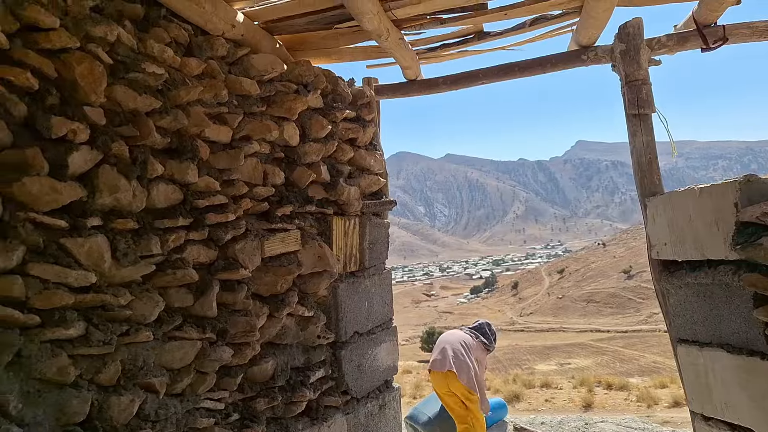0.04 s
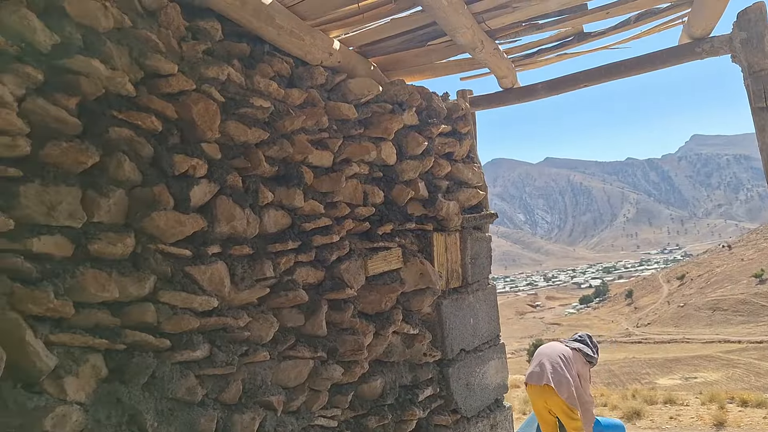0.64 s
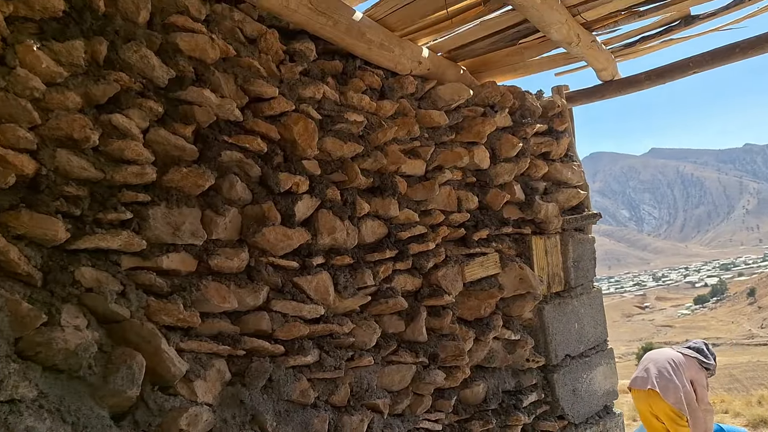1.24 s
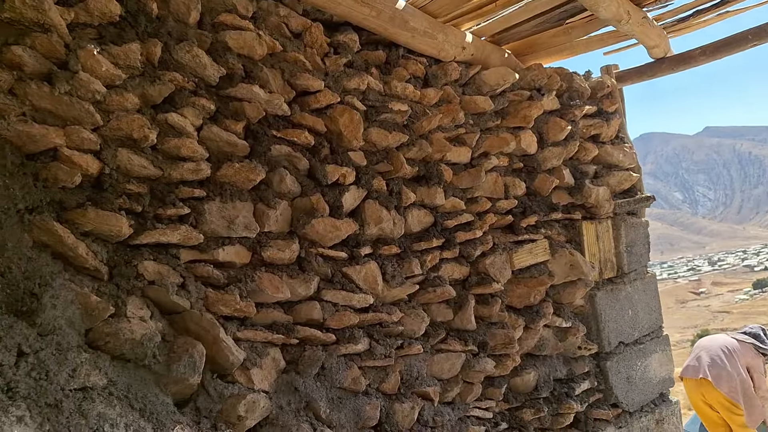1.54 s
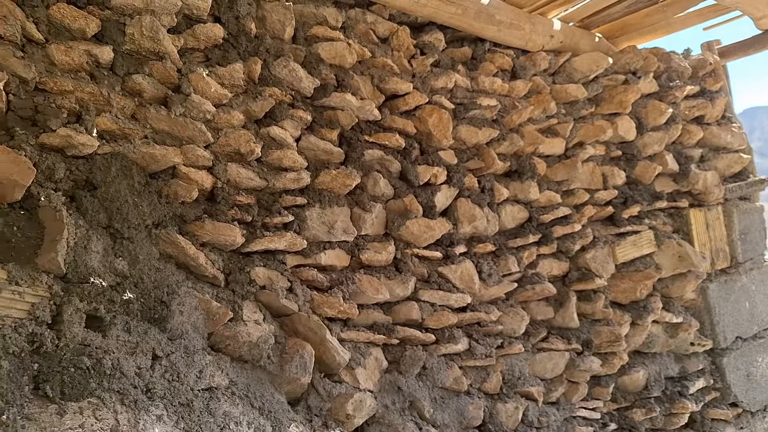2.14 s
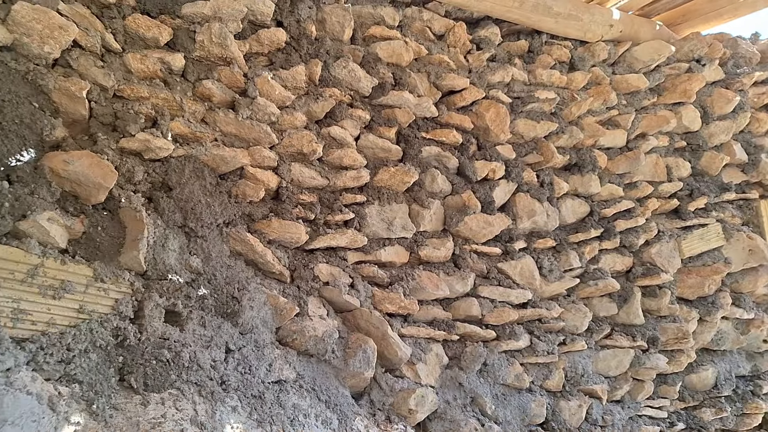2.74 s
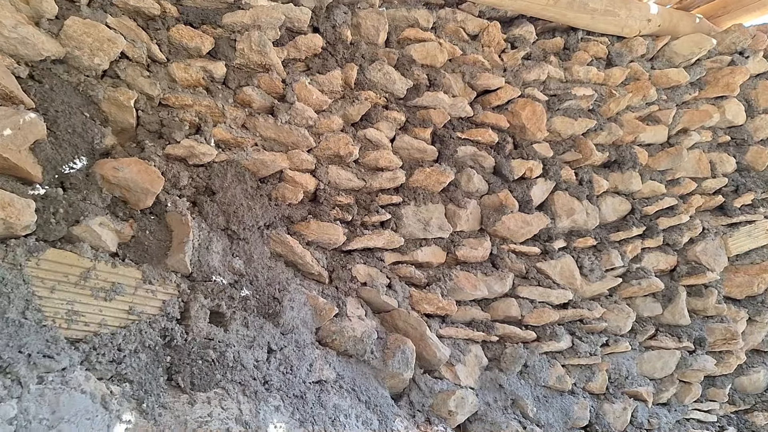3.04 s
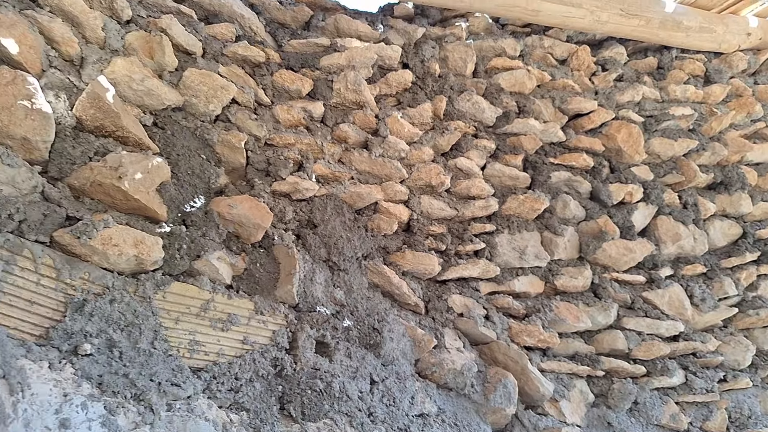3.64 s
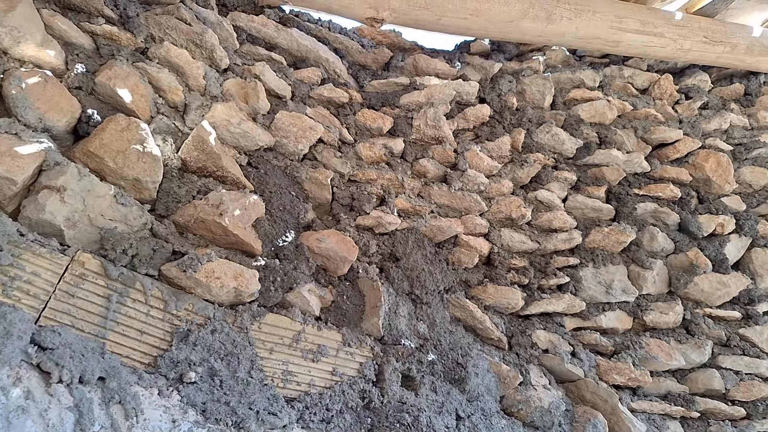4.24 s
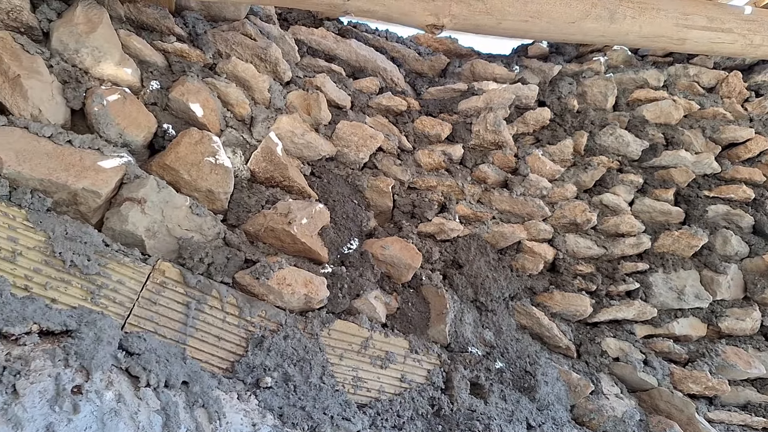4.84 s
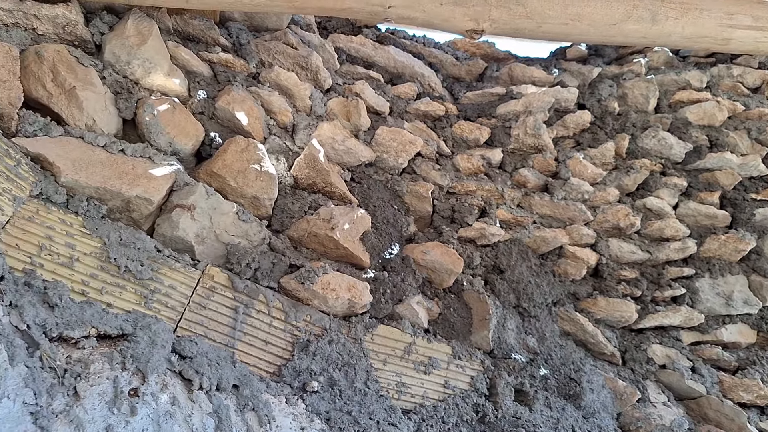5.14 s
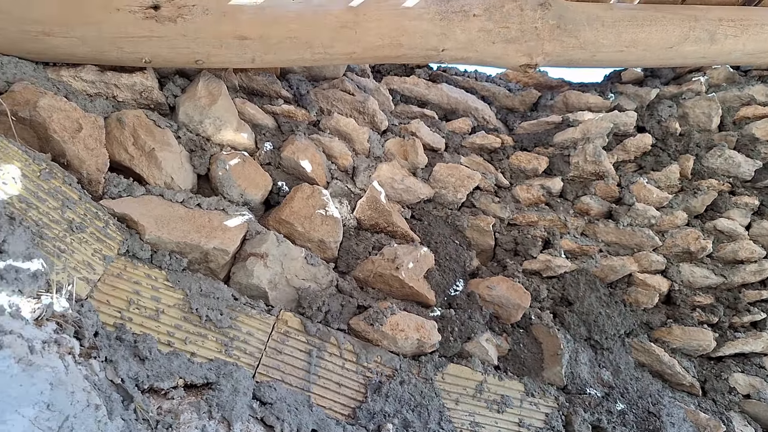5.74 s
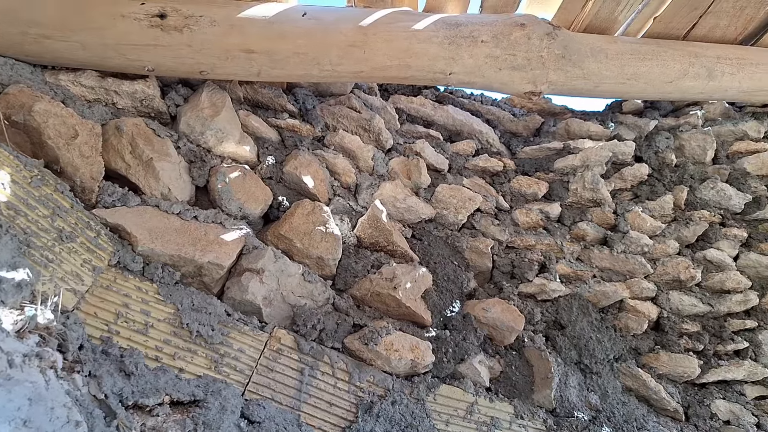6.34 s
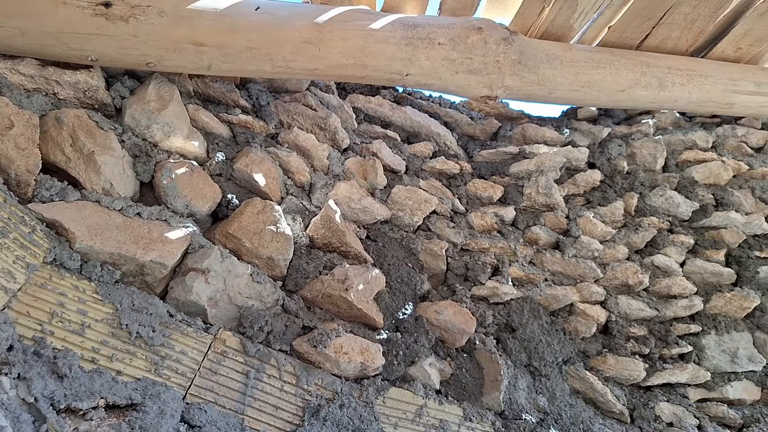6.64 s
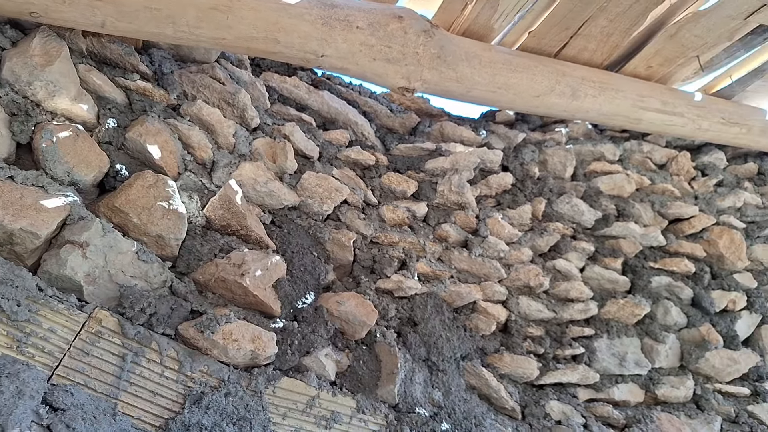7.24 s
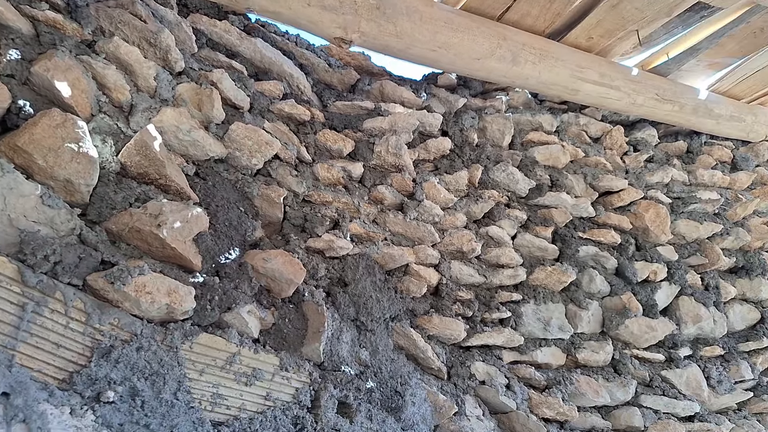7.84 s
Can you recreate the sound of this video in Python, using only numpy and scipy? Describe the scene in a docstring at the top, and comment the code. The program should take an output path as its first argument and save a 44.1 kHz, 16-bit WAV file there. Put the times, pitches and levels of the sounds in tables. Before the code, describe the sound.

A steel hand trowel sweeps back and forth over wet, sandy mortar in uneven hissing, rasping strokes, sometimes pressing down with a dull thud. Four times a shovel bites into the mix, louder, with gravel grinding and stones clacking on its briefly ringing blade. The work is close by, outdoors beside a stone wall, over a faint low rumble. At the very end, wind briefly bumps the left microphone.

```python
"""Working mortar by a stone wall

A hand trowel sweeps to and fro over wet, gritty mortar: sand hisses under the steel, coarser grains
make the plate rasp, and the blade presses down with dull thuds. Now and then a shovel bites into the
mix, and stones grind and clack along its ringing blade. Under it lie a low rumble and a soft hum;
at the very end, wind briefly buffets the left microphone."""
import sys
import numpy as np
from scipy import signal
from scipy.fft import irfft, next_fast_len
from scipy.io import wavfile

SR = 44100
rng = np.random.default_rng(int(sys.argv[2]) if len(sys.argv) > 2 else 0)


def persist_wave(psi):
    """Save psi, clipped to +-1, as 16-bit WAV."""
    counts = np.round(np.clip(psi, -1, 1) * 32767).astype(np.int16)
    wavfile.write(sys.argv[1], SR, np.atleast_2d(counts).T)


N = 351918

# hiss of sand under steel: (frequency [Hz], level [dB])
SAND = [(710, -24), (1200, -2), (1830, -0.5), (2200, -0.5), (2380, -2), (3290, -2.5), (4170, -4.5),
        (4500, -4), (6230, -6), (7490, -3), (8720, -11.5), (12700, -6.5), (15200, -17.5), (16000, -15)]
# grind of coarse grit: (frequency [Hz], level [dB])
GRIT = [(120, -48), (200, -8), (294, -18.5), (334, -11), (387, -9.5), (722, -2.5), (968, -5), (1230, -11),
        (1770, -6), (2050, -14.5), (2330, -11), (4430, -9.5), (8580, -15), (12600, -16), (16000, -24.5)]
# modes of the shovel blade: (frequency [Hz], level [dB])
BLADE_MODES = [(265, -0.5), (340, 8), (425, -6), (475, -2), (544, -3), (646, -3), (724, -4), (904, -8.5),
               (1144, -2.5), (1233, 12.5), (1292, -16.5), (1879, -10.5), (1990, -7), (2139, 0.5),
               (2554, -11), (2803, -6), (3090, -4.5), (3908, -13.5)]
# stereo width: (frequency [Hz], left-right correlation [-1..1])
CORRELATION = [(40, .75), (110, .92), (350, .92), (650, .68), (1000, .05), (1400, -.45), (2200, 0),
               (15000, 0)]
# stereo balance: (frequency [Hz], left minus right [dB])
BALANCE = [(60, 9.5), (92, 2), (140, 2.5), (210, 9), (330, 2.5), (500, -0.5), (770, 2), (1170, -1.5),
           (1790, -3), (2740, -2.0), (4190, -3.5), (6410, 2), (9810, -2), (15000, -7)]

SIDES = np.array([[1], [-1]])   # left, right
FFT_SIZE = next_fast_len(N)
HZ = np.arange(FFT_SIZE // 2 + 1) * SR / FFT_SIZE + 1e-3
CLOCK = np.arange(0, N / SR + .002, .001)   # time base of the hand movements [s]


def from_db(db):
    """Decibels to gain."""
    return 10 ** (np.asarray(db) / 20)


def unit_power(x):
    """Scale to an RMS of one."""
    return x / np.sqrt(np.mean(x ** 2) + 1e-20)


def at_hz(points, hz):
    """Read a curve on a log-frequency axis."""
    f, value = np.transpose(points)
    return np.interp(np.log(hz + 1), np.log(f), value)


def band(low_hz, high_hz, order=6):
    """Gain of a steep band-pass."""
    return ((1 + (low_hz / HZ) ** (2 * order)) * (1 + (HZ / high_hz) ** (2 * order))) ** -.5


def colour(spectrum):
    """Gain of a spectrum table."""
    return from_db(at_hz(spectrum, HZ))


def resonances(modes):
    """Gain of a set of peaks: (frequency [Hz], width [Hz], level [dB])."""
    return np.sqrt(sum(from_db(db) ** 2 / (1 + (2 * (HZ - hz) / width) ** 2) ** 2
                       for hz, width, db in modes))


def wash(gain):
    """Coloured stereo noise of unit power: alike in the bass, unrelated in the treble."""
    mid, side = rng.standard_normal((2, 2 * len(HZ)), dtype=np.float32).view(np.complex64)
    pan = from_db(SIDES * at_hz(BALANCE, HZ) / 2)
    alike = at_hz(CORRELATION, HZ)
    spectrum = gain * pan * (np.sqrt(1 + alike) * mid + SIDES * np.sqrt(1 - alike) * side)
    return unit_power(irfft(spectrum.astype(np.complex64), FFT_SIZE)[:, :N])


def drift(rate_hz):
    """Smooth random wander of unit power."""
    pole = np.exp(-40 * np.pi * rate_hz / SR)
    slow = signal.lfilter([1], [1, -2 * pole, pole * pole], rng.standard_normal(N // 20 + 2002))[2000:]
    return np.interp(np.arange(N) / 20, np.arange(len(slow)), unit_power(slow))


def dying(power, t60):
    """Each burst of power dies away exponentially."""
    return signal.lfilter([1], [1, -from_db(-120 / (t60 * SR))], power + 1e-18)


def grains(per_s, spread_db, t60):
    """Envelope of grains that catch and break at random; spread makes a few of them larger."""
    power, caught = np.zeros(N), rng.random(N) < per_s / SR
    power[caught] = from_db(spread_db * np.minimum(rng.exponential(1, N)[caught], 4)) ** 2
    return unit_power(np.sqrt(dying(power, t60)))


def blows(times, levels_db, t60, rise_s):
    """Envelope of single blows: a quick rise, then a decay."""
    power = np.zeros(N)
    power[np.clip(np.round(times * SR).astype(int), 0, N - 1)] = from_db(levels_db) ** 2
    pole = np.exp(-1 / (rise_s * SR))
    return np.sqrt(signal.lfilter([1 - pole], [1, -pole], dying(power, t60)))


def columns(rows):
    """The columns of an event table, ready to spread over time."""
    return np.transpose(rows)[..., None]


def swells(start, hold, rise, fall):
    """Level in dB, one row per stroke: the rise ends at start; rise and fall each cover 20 dB."""
    outside = np.maximum((start - CLOCK) / rise, (CLOCK - start - hold) / fall)
    return -20 * np.clip(outside, 0, 10) ** 0.97


def progress(start, length):
    """Runs from 0 to 1 during each stroke."""
    return np.clip((CLOCK - start) / length, 0, 1)


def summed(levels_db, lag_s=0):
    """Gain at every sample of strokes that add in power."""
    gain = np.sqrt(np.sum(from_db(levels_db) ** 2, axis=0))
    return np.interp(np.arange(N) / SR - lag_s, CLOCK, gain)


def trowel_strokes():
    """Envelopes of hiss, fine dust and rasp: long even glides, with short flicks on top."""
    # the trowel glides over the mortar: (time [s], hold [s], rise [s], hiss [dB],
    # swell over the hold [dB], rasp offset [dB], dust offset [dB])
    sweeps = [(0.0, 0.12, .05, -49, -9, -4, -3.5), (0.22, 0.15, 0.047, -48.5, 4, -2.5, -1.5),
              (0.59, 0.084, 0.11, -44.5, 1, -5, -3), (0.83, 0.08, 0.25, -57, -2, -0.5, -1.5),
              (0.93, 0.15, .05, -69.5, -8, -2, 0.5), (1.44, .13, 0.084, -54.5, 2, -1.5, -5),
              (1.62, 0.25, 0.098, -60, -4, -7.5, -0.5), (2.27, 0.015, 0.078, -54, 3.5, -10.5, -4),
              (2.33, 0.073, 0.1, -59.5, 4.5, -5, -6.5), (2.44, 0.13, 0.073, -69.5, -14.5, 5.5, -6.5),
              (2.9, 0.61, 0.065, -56.5, 1.5, -3.5, -3.5), (3.4, 0.015, 0.041, -78, -1, 1, -13),
              (3.53, 0.046, 0.063, -43.5, 0.5, -5.5, -6.5), (3.79, 0.081, 0.04, -46, 4, -6.5, -3.5),
              (4.1, 0.081, .045, -46, -2, -5.5, -1.5), (4.36, 0.079, 0.2, -62.5, -3, -3.5, 0.5),
              (4.48, .14, .05, -79.5, 1, 7, -13), (4.99, 0.16, .15, -47, -3.5, -5.5, -6),
              (5.17, 0.13, 0.059, -58.5, -11, -3.5, -0.5), (5.4, 0.043, .08, -47.5, -3.5, -0.5, -5),
              (5.57, .11, 0.13, -48, 1, -3, -4.5), (5.94, 0.11, 0.094, -47, -2, -8, -3),
              (6.1, 0.3, .05, -62.5, -15.5, -10, -4), (6.385, 0.17, 0.02, -49.5, -6.5, -0.5, -2.5),
              (6.58, 0.054, 0.095, -42, 4.5, 0, -3), (6.82, 0.15, 0.085, -47, 7, -3, -1.5),
              (7.1, 0.078, 0.056, -53, -0.5, -3.5, -2), (7.33, .13, 0.13, -69, 2, -28, 3),
              (7.49, 0.17, .05, -64, -7.5, -0.5, -2)]
    # the wrist speeds up and presses the blade down:
    # (peak time [s], rise [s], fall [s], hiss [dB], rasp offset [dB], dust offset [dB])
    flicks = [(0.14, 0.065, 0.048, -35, -1.5, -4), (0.468, .068, 0.029, -28, -6.5, -4),
              (1.985, 0.043, 0.11, -33.5, -5, -2), (3.343, 0.034, 0.04, -37, 1.5, -5),
              (3.658, 0.077, 0.031, -35, -1, -4), (3.954, 0.057, 0.03, -31, -4, -2.5),
              (5.799, 0.088, 0.05, -35, -7, -3.5), (6.668, 0.025, 0.031, -38.5, 1, -5.5),
              (6.995, 0.038, 0.031, -32.5, -0.5, -3.5)]
    time, hold, rise, db, swell_db, rasp_db, dust_db = columns(sweeps)
    glide_db = db + swells(time, hold, rise, fall=0.04) + swell_db * (progress(time, hold) - .5)
    time, rise, fall, db, flick_rasp_db, flick_dust_db = columns(flicks)
    hiss_db = np.vstack([glide_db, db + swells(time, 0, rise, fall)])
    dust = summed(hiss_db + np.vstack([dust_db, flick_dust_db]))
    rasp = summed(hiss_db + np.vstack([rasp_db, flick_rasp_db]))
    return summed(hiss_db), dust, rasp


def trowel(hiss, dust, rasp):
    """Fine sand hisses under the steel; coarser grains make the damped plate rasp."""
    # body of the damped plate: (frequency [Hz], level [dB])
    plate_body = [(150, -17), (250, 0), (302, -13), (366, -7), (397, 1.5), (461, -5), (762, -1.5),
                  (1160, 0), (1620, 1.5), (1800, -2.5), (2340, -21.5), (3960, -120)]
    # resonances of the trowel: (frequency [Hz], width [Hz], level [dB])
    plate_modes = [(730, 540, -5.5), (1980, 62, -1.5), (2680, 93, -0.5), (3170, 37, -14), (3984, 91, 4.5),
                   (4480, 35, 3.5)]
    fine = grains(per_s=1200, spread_db=0, t60=0.13)
    coarse = grains(per_s=900, spread_db=2, t60=0.04)
    # each upper resonance comes and goes as the contact shifts
    rings = sum(wash(resonances([(hz, width, db)])) * from_db(db + 3.5 * drift(rate_hz=12))
                for hz, width, db in plate_modes if hz > 1500)
    sand = wash(colour(SAND) * band(2370, 6470)) * from_db(-2) + unit_power(rings) * from_db(-12)
    # the lowest part of the hiss needs pressure on the blade
    pressed = np.sqrt(hiss * rasp) * wash(colour(SAND) * band(1633, 2500)) * from_db(-7.5)
    fizz = wash(colour(SAND) * band(7000, 21000))
    plate_tone = unit_power(colour(plate_body)) + from_db(-5.5) * unit_power(resonances(plate_modes))
    plate = wash(plate_tone * band(267, 2300))
    return (fine * (hiss * sand + dust * fizz + pressed) + coarse * rasp * plate) * from_db(1)


def trowel_ring(hiss):
    """The steel rings more freely when it barely touches, so it stands out in the lightest strokes."""
    # thin ring of the free plate: (frequency [Hz], width [Hz], level [dB])
    free_modes = [(2786, 59, -10), (2893, 61, -3.5), (3620, 35, -4), (4930, 240, -4)]
    follow = 0.38   # share of the hiss's swing in dB
    return hiss ** follow * from_db(-48.5) * wash(resonances(free_modes))


def crumbs(low_hz, high_hz, count):
    """Bits of gravel are flicked aside at random, each with a brief ring of its own pitch."""
    spread_db, t60_cycles = 1.5, 51
    out, age = np.zeros((2, N + SR)), np.arange(SR // 30) / SR
    for when, softness, pitch, left, right in rng.random((count, 5)):
        hz, start = low_hz * (high_hz / low_hz) ** pitch, int(when * N)
        level_db = -spread_db * min(-np.log(1 - softness), 4)
        decay = from_db(level_db - 60 * age * hz / t60_cycles)
        ring = np.sin(2 * np.pi * (hz * age + np.array([[left], [right]])))
        out[:, start:start + len(age)] += decay * ring
    return unit_power(out[:, :N])


def ground_rumble(dragging):
    """Dragged tools shake the ground, over the low rumble of the yard."""
    # tone of the ground: (frequency [Hz], level [dB])
    ground_tone = [(15, -52.5), (25, -8.5), (49, -10), (97, 1.5), (116, -3), (178, -11), (198, -9.5),
                   (259, -10), (300, 5.5), (390, -33), (660, -120)]
    # the yard's own rumble: (time [s], level [dB])
    yard_rumble = [(0.0, -52), (0.6, -53), (1.0, -66.5), (1.5, -61.5), (1.8, -83), (3.0, -61.5),
                   (5.5, -62.5), (7.5, -72)]
    bed = from_db(np.interp(np.arange(N) / SR, *np.transpose(yard_rumble)))
    return np.hypot(dragging, bed) * wash(colour(ground_tone) * band(36, 220)) * from_db(-2)


def still_air():
    """A faint, steady bed of outdoor air."""
    # tone of the air: (frequency [Hz], level [dB])
    air_tone = [(60, -5), (170, -12.5), (400, -15), (800, -21), (1400, -19), (2900, -27), (9000, -26.5),
                (12000, -27), (16000, -28)]
    return wash(colour(air_tone)) * from_db(-67)


def wall_echoes(sound, t60, count=24):
    """Faint echoes from wall and ground, different on each side; only the shorter waves scatter."""
    out = np.zeros((2, N))
    for k, (delay, sign) in enumerate(zip(rng.uniform(.006, .09, count), rng.choice([-1, 1], count))):
        lag = int(delay * SR)
        out[k % 2, lag:] += sign * from_db(-60 * delay / t60) * sound[k % 2, :-lag]
    return signal.sosfilt(signal.butter(2, 600, "high", fs=SR, output="sos"), out)


def grain_snaps():
    """Single grains snap brightly."""
    # snapping grains: (time [s], level [dB])
    snaps = [(0.2204, -48), (1.53, -42), (1.218, -17), (1.836, -41), (1.936, -34), (3.335, -29),
             (3.7758, -39.5), (4.7552, -17), (5.52, -61), (6.21, -40), (7.666, -34), (7.702, -26.5)]
    time, db = np.transpose(snaps)
    envelope = blows(time, db, t60=0.047, rise_s=0.00048)
    return envelope * wash(colour(SAND) * band(3300, 17000)) * from_db(-6.5)


def stone_clacks():
    """A stone hits the blade: a short crack and knock, then a ring that the mortar soon damps."""
    # stones striking the blade: (time [s], impact [dB], ring pitch [Hz], ring [dB])
    strikes = [(0.345, -46, 1150, -47), (0.667, -39, 900, -57), (0.827, -33, 392, -47.5),
               (1.127, -37, 1150, -46), (1.2, -11.5, 770, -44), (1.221, -12, 330, -25),
               (1.241, -17, 510, -27), (1.25, -19.5, 870, -30), (1.271, -30, 447, -21.5),
               (2.596, -15.5, 2010, -27.5), (2.654, -24.5, 740, -40), (2.699, -5, 540, -39),
               (2.706, -22, 2040, -21.5), (2.738, -22.5, 346, -22.5), (2.76, -9, 644, -25.5),
               (2.787, -19, 653, -37), (2.815, -19.5, 679, -23.5), (2.98, -35, 840, -52),
               (3.14, -46, 730, -68), (3.197, -52, 930, -56), (3.336, -28, 726, -41),
               (3.948, -15, 788, -36), (4.665, -20, 1220, -29.5), (4.674, -16, 438, -28.5),
               (4.712, -14, 1250, -22.5), (4.712, -25, 698, -21.5), (4.756, -8.5, 1290, -37),
               (5.281, -42, 744, -57), (6.375, -36, 402, -45), (6.752, -45, 900, -60),
               (7.662, -26, 617, -46), (7.896, -20, 618, -32.5)]
    time, db = np.transpose(strikes)[:2]
    crack = blows(time, db - 18.5, t60=0.05, rise_s=.0015) * wash(colour(GRIT) * band(1800, 16000))
    knock = blows(time, db - 8.5, t60=0.045, rise_s=0.001) * wash(colour(GRIT) * band(300, 3000))
    return crack + knock + blade_ring(strikes, t60=0.09, reach_octaves=0.088) * from_db(8)


def blade_ring(strikes, t60, reach_octaves):
    """Each stone rings mainly the modes near one pitch, which depends on where it hits."""
    out, age = np.zeros((2, N)), np.arange(SR // 8) / SR
    hz, mode_db = np.transpose(BLADE_MODES)
    envelope = from_db(-60 * age / t60) * (1 - np.exp(-age / 0.0041))
    for time, _, centre_hz, ring_db in strikes:
        nearness = np.exp(-(np.log2(hz / centre_hz) / reach_octaves) ** 2)
        weight = from_db(0.34 * mode_db) * (nearness + 0.046)
        # high modes reach left and right out of step
        phase = 2 * np.pi * rng.random(len(hz)) + rng.standard_normal((2, len(hz))) * hz / 1600
        ring = weight @ np.sin(2 * np.pi * hz[:, None] * age + phase[..., None]) / np.linalg.norm(weight)
        start = round(time * SR)
        out[:, start:start + len(age)] += (from_db(ring_db) * envelope * ring)[:, :N - start]
    return out


def low_thuds(t60):
    """Dull low thuds, each a soft slap and a few damped low cycles."""
    # dull low thuds; the last two are wind buffeting the left microphone:
    # (time [s], level [dB], pitch [Hz])
    thuds = [(0.459, -30, 91.5), (0.52, -25.5, 108), (0.551, -32, 96.5), (0.583, -38.5, 89.5),
             (0.681, -42, 53), (1.218, -31, 112), (2.588, -40.5, 183), (2.731, -30, 95.5),
             (2.754, -24.5, 96), (3.332, -36.5, 91.5), (3.943, -33.5, 95), (4.675, -36.5, 120),
             (4.975, -45.5, 116), (5.301, -51, 104), (5.789, -54, 85), (6.574, -45, 99.6),
             (6.653, -39, 101), (6.998, -33, 90), (7.697, -38, 158), (7.873, -29.5, 54.4),
             (7.901, -29, 48.7)]
    thumps, age = np.zeros((2, N)), np.arange(SR // 5) / SR
    for time, db, hz in thuds:
        envelope = from_db(db - 60 * age / t60) * (1 - np.exp(-age / 0.0034))
        thump = envelope * np.sin(2 * np.pi * hz * age)
        pan = from_db(SIDES * at_hz(BALANCE, hz) / 2)
        start = round(time * SR)
        thumps[:, start:start + len(age)] += pan * thump[:N - start]
    time, db = np.transpose(thuds)[:2]
    slaps = blows(time, db, t60=0.078, rise_s=0.0038) * wash(band(130, 380, order=3))
    return thumps * from_db(5) + slaps * from_db(-11.5)


def low_hum():
    """A soft, narrow band of low noise swells between strokes."""
    # swells of the hum: (peak time [s], rise [s], level [dB])
    hum_swells = [(0.88, 0.1, -54.5), (1.45, 0.08, -64), (1.63, 0.18, -62.5), (2.46, 0.25, -56.5),
                  (4.38, 0.5, -67), (4.6, 0.16, -62.5), (5.8, 0.2, -65), (6.6, 0.32, -70)]
    time, rise, db = columns(hum_swells)
    return summed(db + swells(time, 0, rise, fall=0.044)) * wash(band(132, 180)) * from_db(5.5)


def shovel_strokes():
    """Envelopes of grit, dust, edge, bowl, heap and rumble: the shovel bites, pushes, drags and lifts."""
    # scoops: (time [s], bite [s], push [s], drag [s], loss over the drag [dB], then at full push:
    # grit [dB], edge [dB], bowl [dB], heap [dB], rumble [dB], dust offset from grit [dB])
    scoops = [(1.129, 0.011, 0.016, 0.032, -5, -41, -39, -53, -47, -46.5, 6.5),
              (1.16, 0.026, 0.061, 0.18, 16, -30.5, -26.5, -24.5, -21.5, -32.5, -1),
              (2.603, 0.016, 0.12, 0.15, 22, -28.5, -25, -20.5, -23.5, -37.5, -1.5),
              (4.674, 0.017, .005, 0.013, 11.5, -35.5, -27.5, -19.5, -30, -38, 5.5),
              (4.716, 0.04, 0.028, 0.12, 7, -33.5, -31.5, -30, -39, -43, 2.5),
              (7.668, 0.021, .045, 0.16, 7.5, -48, -44, -38, -39.5, -44, 5),
              (7.872, 0.039, 0.042, 0.12, 1, -37, -39.5, -38.5, -39, -41, 4)]
    # the blade fills as it is pushed in, so the deep layers grow most:
    # (grit [dB], edge [dB], bowl [dB], heap [dB], rumble [dB])
    push_growth = [1.4, 1.7, 12, 16.4, 11]
    time, bite, push, drag, loss_db, *layers_db, dust_db = columns(scoops)
    stroke_db = swells(time, push + drag, bite, fall=0.042) - loss_db * progress(time + push, drag)
    grit, edge, bowl, heap, rumble = [stroke_db + db - growth_db * (1 - progress(time, push))
                                      for db, growth_db in zip(layers_db, push_growth)]
    shaking = summed(rumble, lag_s=0.015)   # the ground answers after the blade
    return summed(grit), summed(grit + dust_db), summed(edge), summed(bowl), summed(heap), shaking


def shovel(grit, dust, edge, bowl, heap):
    """Gravel grinds in uneven slips: the edge rasps, the bowl rings hollow, the heap sounds lowest."""
    # mortar lying on the blade damps its modes, the high ones most
    modes = [(hz, 16 + hz * 0.0086, db) for hz, db in BLADE_MODES]
    steel = unit_power(resonances(modes)) * from_db(-6.5) + unit_power(colour(GRIT)) * from_db(7.5)
    slips = from_db(1.4 * drift(rate_hz=32))
    sand = grains(per_s=2000, spread_db=2.5, t60=0.041)
    stones = grains(per_s=700, spread_db=0, t60=0.095)
    spray = grit * wash(steel * band(2400, 7400)) + dust * wash(steel * band(8000, 17000)) * from_db(-7.5)
    rasp = edge * wash(steel * band(1100, 2600)) * from_db(-3.57)
    hollow = bowl * wash(steel * band(580, 950)) * from_db(-5.5)
    shifting = heap * wash(steel * band(240, 500)) * from_db(-6.5)
    return slips * (sand * (spray * from_db(0.03) + rasp) + stones * (hollow + shifting))


def scene():
    """Both tools with crumbs crunching under them, their echoes, low thuds and the yard around them."""
    hiss, dust, rasp = trowel_strokes()
    grit, grit_dust, edge, bowl, heap, shaking = shovel_strokes()
    tools = trowel(hiss, dust, rasp) + trowel_ring(hiss)
    tools += edge * from_db(-4) * crumbs(low_hz=1080, high_hz=5000, count=1500)
    tools += rasp * from_db(-11.5) * crumbs(low_hz=738, high_hz=5750, count=900)
    tools += shovel(grit, grit_dust, edge, bowl, heap) + stone_clacks() + grain_snaps()
    echoes = wall_echoes(tools, t60=0.1) * from_db(-6.5)
    dragging = np.hypot(shaking, rasp * from_db(-13.5))
    return tools + echoes + low_hum() + still_air() + low_thuds(t60=0.087) + ground_rumble(dragging)


def record(dry):
    """The deepest bass rolls off and the top is cut steeply."""
    low_cut = signal.butter(2, 35, "high", fs=SR, output="sos")
    high_cut = signal.ellip(12, .1, 80, 15900, fs=SR, output="sos")
    return signal.sosfilt(high_cut, signal.sosfilt(low_cut, dry))


dry = scene()
out = record(dry)
persist_wave(out)
```